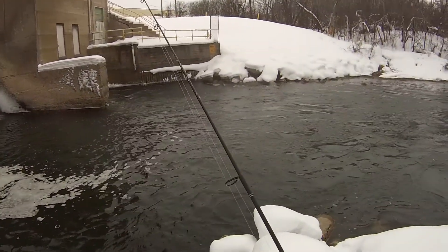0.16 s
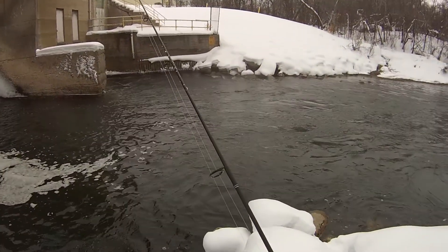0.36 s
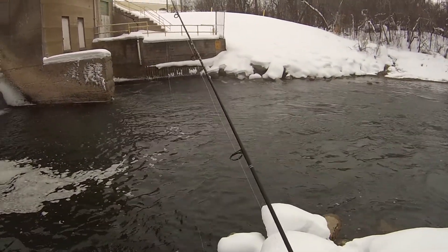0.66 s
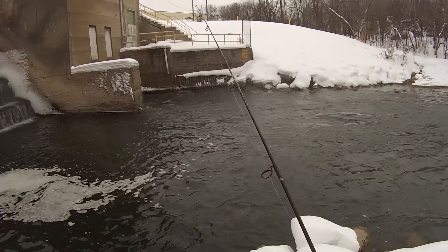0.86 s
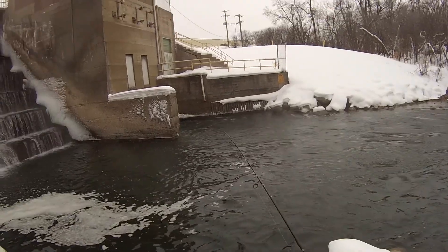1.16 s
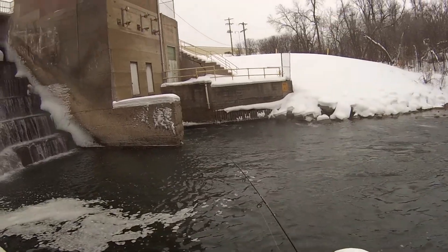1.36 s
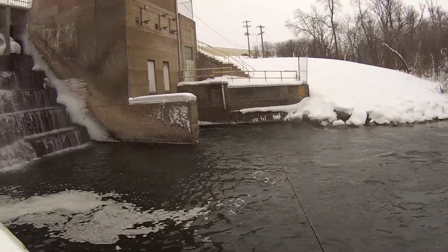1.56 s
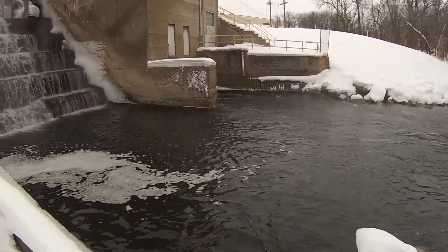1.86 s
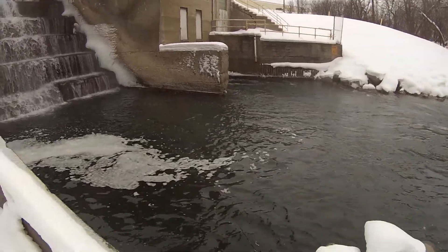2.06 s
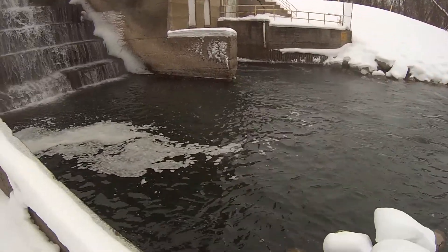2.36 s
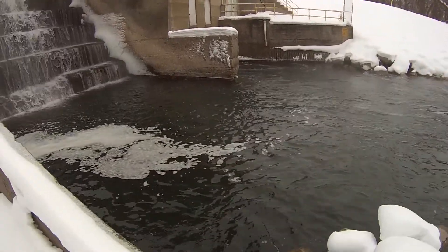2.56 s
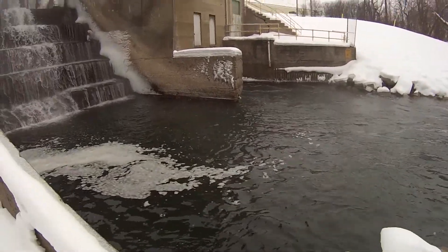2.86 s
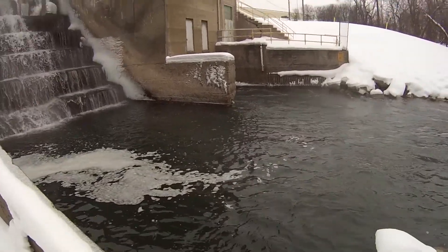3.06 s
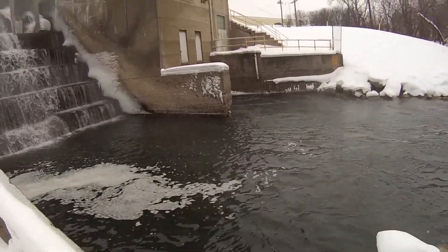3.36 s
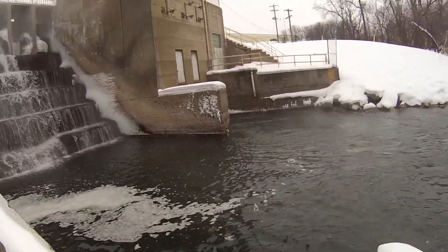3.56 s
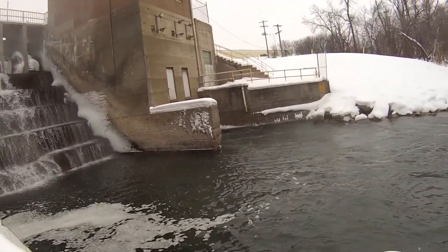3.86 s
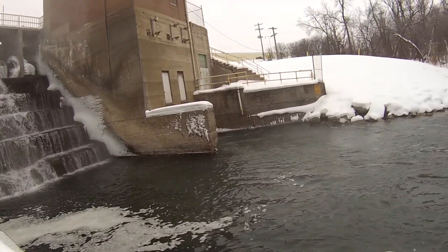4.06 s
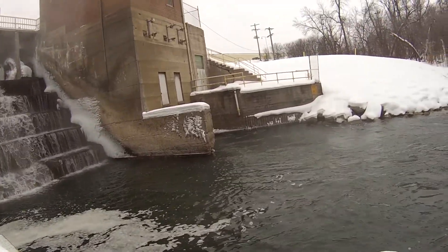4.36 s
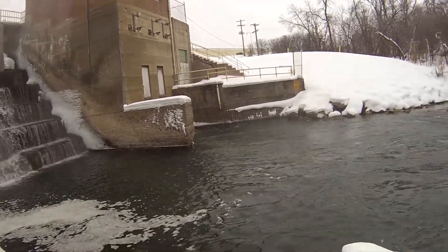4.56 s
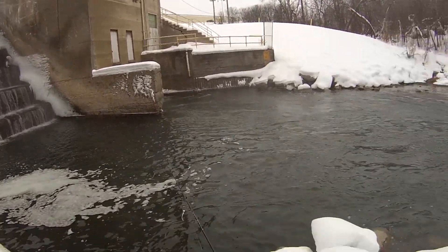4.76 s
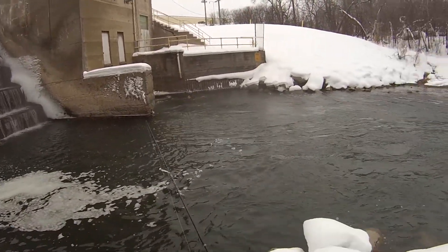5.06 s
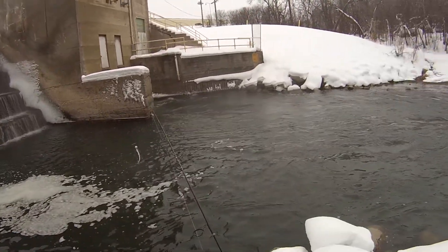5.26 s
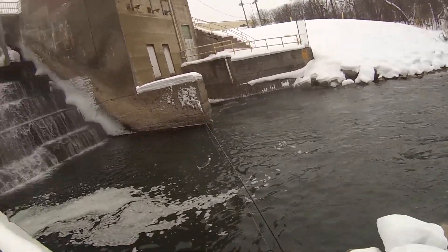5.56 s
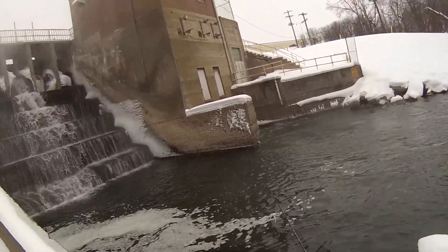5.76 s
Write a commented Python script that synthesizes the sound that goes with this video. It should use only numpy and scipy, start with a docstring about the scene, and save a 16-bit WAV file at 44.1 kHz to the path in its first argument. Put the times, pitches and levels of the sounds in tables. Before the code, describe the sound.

A constant hollow rush of falling water with low rumbling underneath, briefly interrupted near the middle by soft, very low bumps.

```python
"""Across the pool from a stepped concrete spillway, pouring water is heard by a body-worn camera in a closed case.
The rush is noise coloured by frequency, with small random swells; the case adds hollow resonances,
whose strengths shift as the wearer turns and nods. Low filtered noise makes a deep rumble underneath.
Halfway through, the case is jostled into a few dull thumps: short sines of falling pitch, each with a knock."""
import sys
import numpy as np
from scipy import signal
from scipy.fft import rfft, irfft, next_fast_len
from scipy.io import wavfile
from scipy.ndimage import uniform_filter1d, map_coordinates

SR = 44100
rng = np.random.default_rng(int(sys.argv[2]) if len(sys.argv) > 2 else 0)


def store_wav(level_fs):
    """Save 16-bit WAV to argv[1]."""
    pcm = np.round(np.clip(np.atleast_2d(level_fs), -1, 1) * 32767)
    wavfile.write(sys.argv[1], SR, pcm.T.astype(np.int16))


N = 260190  # length in samples


def amp(db):
    """The decibel law: a level in dB becomes an amplitude ratio."""
    return 10 ** (np.asarray(db) / 20)


def unit(x):
    """Normalization by effective value: x scaled to rms 1."""
    return x / np.sqrt(np.mean(x ** 2) + 1e-20)


def along(points, hz):
    """Logarithmic pitch scale: (Hz, value) points interpolated over log frequency."""
    point_hz, values = np.transpose(points)
    return np.interp(np.log(hz + 1), np.log(point_hz + 1), values)


def curves(rows, t):
    """Linear interpolation in time: each column after the first, read at the times t."""
    times, *columns = np.transpose(rows)
    return [np.interp(t, times, column) for column in columns]


def filtered(x, response):
    """Linear filtering: the spectrum of x times a response of frequency."""
    padded = next_fast_len(N + SR // 2)  # room for the filter's ringing
    hz = np.fft.rfftfreq(padded, 1 / SR)
    return irfft(rfft(x, padded) * response(hz), padded)[:N]


def shaded(x, gain_db, size=1024):
    """Time-varying filtering: short-time spectra of x under a gain of frequency and time."""
    hz, t, spectra = signal.stft(x, SR, nperseg=size)
    weighted = spectra * amp(gain_db(hz, t))
    return signal.istft(weighted, SR, nperseg=size)[1][:N]


def wobble(rate):
    """Slow random modulation: a smooth curve through random knots, rate of them a second."""
    knots = rng.standard_normal(int(N * rate / SR) + 4)
    return map_coordinates(knots, [np.arange(N) * rate / SR])


# Colour of the falling water's rush.
# Each row: frequency in Hz, relative spectral density in dB per Hz.
WATER_COLOUR = [(20, -11.5), (100, 0.5), (200, -3), (400, -7), (1000, -3.5), (1900, -3), (3000, -10.5),
                (4300, -10.5), (6100, -18.5), (9200, -25), (11000, -26), (13200, -37), (15000, -37.5)]
RUSH_DB = -52  # mean rms level before the case's lifts


def spillway(patchy_db, surge_db):
    """Superposition of countless splashes gives noise; sheets of water slap the steps unevenly."""
    def patches(hz, t):
        """Local fluctuation: random swells some 500 Hz wide and 0.1 s long."""
        field = rng.standard_normal((len(hz), len(t)))
        field = uniform_filter1d(field, size=12, axis=0)  # smooth over frequency
        field = uniform_filter1d(field, size=9, axis=1)  # smooth over time
        return patchy_db * unit(field)

    rush = shaded(rng.standard_normal(N), patches)
    surge = surge_db * wobble(rate=14)  # the whole sheet of water flutters slightly
    coloured = unit(filtered(rush, lambda hz: amp(along(WATER_COLOUR, hz))))
    return amp(RUSH_DB + surge) * coloured


# Resonances of the case. Each row: centre in Hz, full width at half the dB lift in Hz,
# lift in dB, change of lift in dB per unit of turn, change of lift in dB per unit of nod.
CASE_RESONANCES = [(790, 95, 1.5, 1.5, 0), (1341, 312, 7.5, 0.4, 0.5), (1591, 237, 12, -0.55, 0),
                   (2210, 305, 6, 1.5, -1.3), (2522, 324, 9, -0.5, -1.1), (2884, 370, 4, -3.5, -0.5),
                   (3356, 275, 12, -2.5, 0), (3703, 320, 6.5, -2, -1), (4685, 300, 8, 1.5, 0.5),
                   (5008, 314, 11.5, -0.5, -0.9), (5480, 560, 5.5, -0.5, 0.5), (6606, 410, 8.5, 0.5, -1.4),
                   (7520, 890, 10, -0.6, -0.5), (8560, 680, 2.5, -2.5, 1.2), (9970, 920, 3, 2.5, 1),
                   (11300, 400, 2.5, 1, .3), (12300, 1900, 2, 2, 1.2)]
# Where the camera points.
# Each row: time in seconds, turn towards the spillway and nod upwards (signed, about unit size).
AIM = [(0, -1, 0.5), (.7, -1, -0.75), (1.05, -0.36, -0.025), (1.5, 0.14, 0.58), (2, 0.39, -1.1),
       (2.5, 0.75, -1.3), (3.25, 0.61, -0.71), (3.8, .4, 0.81), (4.5, 0.4, 0.63), (4.8, -.4, 0.65),
       (5.45, -.5, 0.3), (5.75, 0.99, 0.57)]


def through_case(x):
    """Resonance: each mode of the case is fed more or less, according to the side the sound comes from."""
    def lift(hz, t):
        """Modal response: summed bell-shaped lifts in dB that follow the aim."""
        turn, nod = curves(AIM, t)
        total_db = 0
        for centre, width, db, turn_db, nod_db in CASE_RESONANCES:
            bell = 0.5 ** ((2 * (hz - centre) / width) ** 2)
            strength_db = db + turn_db * turn + nod_db * nod
            total_db = total_db + np.outer(bell, strength_db)
        return total_db

    return shaded(x, lift)


# Colour of the rumble. Each row: frequency in Hz, relative spectral density in dB per Hz.
RUMBLE_COLOUR = [(8, -3.5), (22, -2.5), (40, 0.5), (55, 1.5), (70, -9.5), (90, -28.5), (160, -38),
                 (500, -82)]
# Course of the rumble, which slowly rises and falls.
# Each row: time in seconds, rms level in dB about which it flutters.
RUMBLE_COURSE = [(0, -45), (1.2, -47.5), (2.05, -44.5), (3.1, -43), (3.95, -49), (4.45, -44), (5.2, -51.5),
                 (5.7, -45.5)]


def rumble(flutter_db):
    """Low-frequency noise: a deep rumble, slowly rising and falling, with brief random swells."""
    course_db, = curves(RUMBLE_COURSE, np.arange(N) / SR)
    low_noise = unit(filtered(rng.standard_normal(N), lambda hz: amp(along(RUMBLE_COLOUR, hz))))
    flutter = flutter_db * wobble(rate=6.5)
    return amp(course_db + flutter) * low_noise


# Soft bumps against the case. Each row: time of the envelope's top in seconds, level of that top in dB,
# pitch there in Hz, knock level relative to the boom in dB.
THUMPS = [(2.824, -24.5, 58, -32), (2.86, -20, 59, -18.5), (3.027, -13.5, 46, -40), (3.063, -24.5, 43, -36),
          (3.103, -17.5, 50, -33), (3.139, -20.5, 41.5, -35)]
THUMP_RISE_S, THUMP_FALL_S = 0.013, 0.019  # from the top to 1/e on either side
KNOCK_HZ, KNOCK_S = 120, 0.0042  # pitch of the dull contact, and its time from top to 1/e
SAG_HZ_PER_S = 530  # the boom drops in pitch as the push lets go


def thumps():
    """Compression: each padded bump squeezes the case's air into a short boom, with a dull knock at contact."""
    out = np.zeros(N)
    for top_s, db, hz, knock_db in THUMPS:
        t = np.arange(N) / SR - top_s
        swell = np.exp(-(t / np.where(t < 0, THUMP_RISE_S, THUMP_FALL_S)) ** 2)
        cycles = (hz - SAG_HZ_PER_S * t / 2) * t  # integral of the falling pitch
        boom = swell * np.sin(2 * np.pi * cycles)
        knock = np.exp(-(t / KNOCK_S) ** 2) * np.sin(2 * np.pi * KNOCK_HZ * t)
        out += amp(db) * (boom + amp(knock_db) * knock)
    return out


def scene():
    """Superposition: the rush through the case, plus the rumble and the bumps."""
    water = through_case(spillway(patchy_db=0.63, surge_db=0.05))
    return (water + rumble(flutter_db=0.8) + thumps())[None]


TOP_HZ = 15250  # upper band limit


def record(dry):
    """Band limitation: the camera keeps nothing from its upper limit on."""
    return filtered(dry[0], lambda hz: hz < TOP_HZ)[None]


dry = scene()
out = record(dry)
store_wav(out)
```